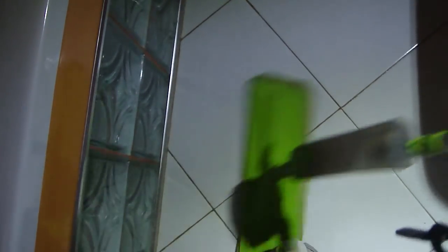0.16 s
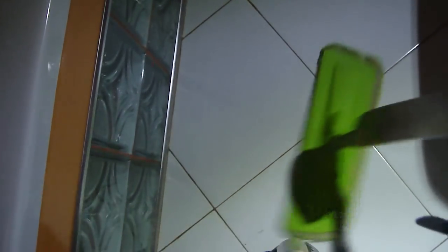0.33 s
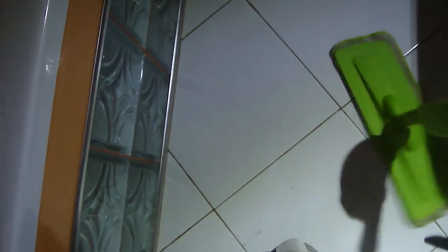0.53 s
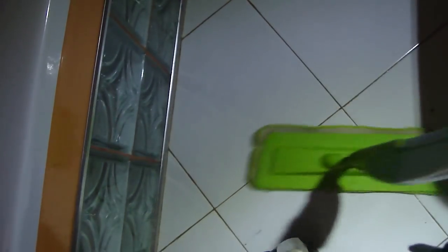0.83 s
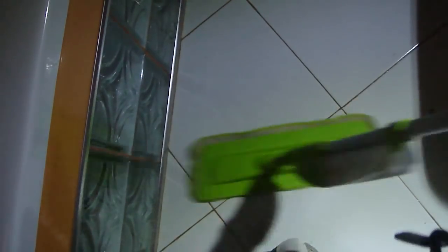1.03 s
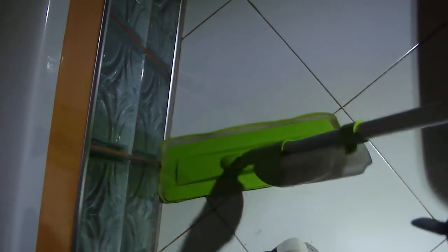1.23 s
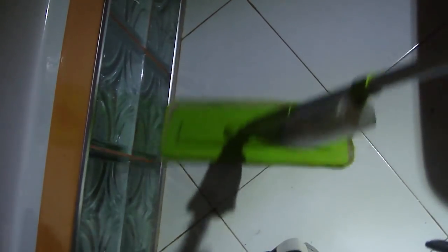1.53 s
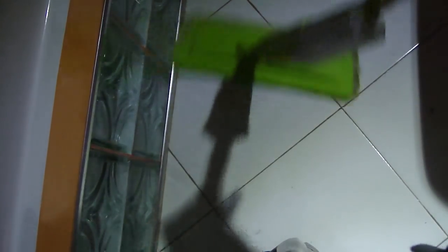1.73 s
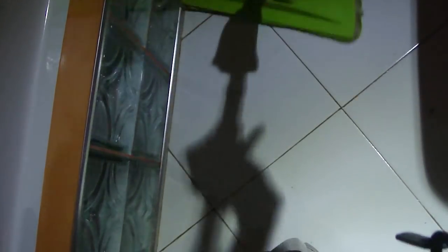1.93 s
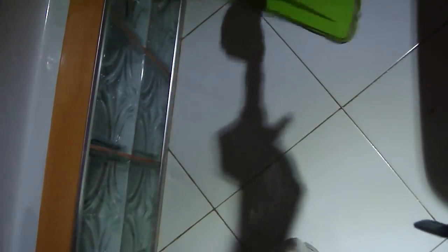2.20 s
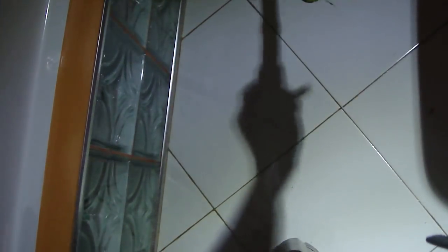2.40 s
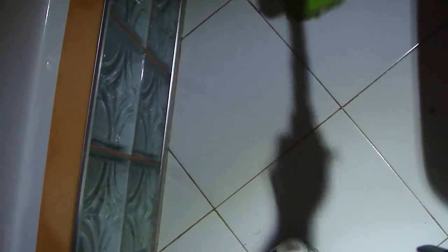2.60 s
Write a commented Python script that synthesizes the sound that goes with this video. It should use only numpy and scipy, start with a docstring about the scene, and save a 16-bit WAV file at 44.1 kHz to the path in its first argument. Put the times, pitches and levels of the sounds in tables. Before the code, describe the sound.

A flat plastic mop knocks, rattles and swishes over floor tiles in a small hard room

```python
"""Mop knocking and scuffing over tiles

A flat plastic mop is pushed over floor tiles in a small, hard room. Its head and joint knock, three times hard
against a wall, and chatter loosely: decaying modes with cracks and thuds. The cloth swishes, rumbles and scuffs:
coloured random grains. A steady broad noise fills the room. The hardest blows overload the recorder."""
import sys
import numpy as np
from scipy import signal
from scipy.fft import rfft, irfft, next_fast_len
from scipy.io import wavfile
from scipy.ndimage import map_coordinates

SR = 44100
rng = np.random.default_rng(int(sys.argv[2]) if len(sys.argv) > 2 else 0)


def voltage_ratio(level):
    """Linear amplitude factor for a level in decibels (scalar or array-like)."""
    return 10 ** (np.asarray(level, float) / 20)


def unload_wav(signal):
    """Save mono or channel-first audio to the path in sys.argv[1] as 16-bit WAV at rate SR, clipped to [-1, 1]."""
    wavfile.write(
        sys.argv[1],
        SR,
        np.round(np.clip(np.atleast_2d(signal).T, -1, 1) * 32767).astype(np.int16),
    )


N = 121275  # samples, 2.75 s

# modes of the mop head: pitch_hz, relative level_db, t60_s (capped in ring())
HEAD_MODES = [(525, -9, 0.036), (616, -45, 0.0056), (655, 7, 0.017), (750, 7.5, .016), (890, 12, 0.011),
              (1010, 10.5, 0.0033), (1250, 16.5, 0.007), (1459, 11.5, 0.0071), (1577, 7.5, 0.0063),
              (1688, 20, 0.0043), (1900, 1.5, 0.012), (2035, 0, 0.014), (2500, 11.5, 0.0072),
              (3200, -26, .006)]
# colour of the bright crack of plastic: freq_hz, relative level_db
CRACK_COLOUR = [(500, -31), (2000, 13), (4500, -5), (8000, -16), (11000, -37)]


def unit(x):
    """Scaled to rms 1."""
    return x / np.sqrt(np.mean(x ** 2) + 1e-20)


def along(points, hz):
    """Reads (Hz, value) points on a log frequency axis."""
    f, v = np.transpose(points)
    return np.interp(np.log(hz + 1), np.log(f + 1), v)


def filtered(x, response):
    """x times a response of frequency."""
    m = next_fast_len(len(x) + 8192)
    spectrum = rfft(x, m) * response(np.fft.rfftfreq(m, 1 / SR))
    return irfft(spectrum, m)[:len(x)]


def coloured(x, colour):
    """x with a (Hz, dB) colour, rms 1."""
    return unit(filtered(x, lambda hz: voltage_ratio(along(colour, hz))))


def wobble(rate):
    """A smooth random curve, rate knots a second."""
    knots = rng.standard_normal(int(N * rate / SR) + 4)
    return map_coordinates(knots, [np.arange(N) * rate / SR])


def near(centre_hz, reach_oct):
    """Weight of each mode in dB, falling away from a centre: 6 dB down at reach_oct."""
    return lambda hz: -6 * (np.log2(hz / centre_hz) / reach_oct) ** 2


def ring(modes, t, weight_db, longest_t60_s=0.018):
    """A struck body: damped sines, each a little stronger or weaker at every blow."""
    scatter_db, attack_s = 1.2, 0.0008
    hz, db, t60_s = np.transpose(modes)[:, :, None]
    start_db = db + weight_db(hz) + scatter_db * rng.standard_normal(hz.shape)
    decay_db = 60 * t / np.clip(t60_s, 1e-3, longest_t60_s)
    body = (voltage_ratio(start_db - decay_db) * np.sin(2 * np.pi * hz * t)).sum(0)
    return body * (1 - np.exp(-t / attack_s))


def knocks():
    """Every knock rings the head's modes near its centre, with a crack and a thud, and the room answers."""
    # knocks of head and joint: start_s, level_db (peak of the ring before the trim),
    # centre_hz of the ring, crack_db and thud_db (peaks over the ring's)
    blows = [(.006, -9, 740, -8.5, -6.5), (0.017, -10, 710, -18, -8.5), (.117, -5, 740, -12, -6),
             (.127, -10.5, 710, -38, -26), (0.1856, -1, 870, -14, -26), (.188, 7.5, 1480, -8.5, -7),
             (.192, 10.5, 820, -28, -4), (.5275, -12.5, 890, -30, -16), (.268, -15, 2900, -8, -33),
             (.540, -14, 700, -26, -9), (.553, -13.5, 750, -9, -20), (0.8394, -6, 1940, -18, -47),
             (.8415, -9, 1010, -35, -21.5), (0.852, -18, 1280, -21, -34), (1.142, -21, 2200, 4.5, -1.5),
             (1.16, -2, 1900, 4, -37), (1.164, -7, 2500, -1, -31), (1.168, 6, 780, -26, -8),
             (1.171, 4, 1900, -5.5, -14.5), (1.18, -1, 1230, -3, -4.5), (1.712, -11, 1900, -11, -32),
             (1.7562, -11, 980, -9, -24), (1.783, -10, 1200, -31, -26), (1.896, -15, 915, -4, -34),
             (1.9835, -14.5, 790, -34, -18), (1.996, -37, 890, -37, -18.5), (2.212, -17, 726, -2, -31),
             (2.244, -16.5, 650, -28, -27), (2.266, -16, 1010, -17, -24), (2.275, -6, 655, -24, -20),
             (2.284, -11, 760, -28, -27), (2.411, -4, 2030, -25, -33), (2.416, -2, 614, -0.5, -9),
             (2.422, 1, 1060, -10.5, -12), (2.632, -12, 1500, -12, -33), (2.7155, -16.5, 1090, -23, -23)]
    # low modes of the thud: pitch_hz, relative level_db, t60_s
    thud_modes = [(170, -16, 0.024), (266, -14, 0.013), (290, -20, 0.063), (366, -7.5, 0.027)]
    reach_oct, trim_db, crack_t60_s = 0.55, -2, 0.025
    out, t = np.zeros(N + SR), np.arange(SR // 10) / SR
    for start_s, level_db, centre_hz, crack_db, thud_db in blows:
        body = ring(HEAD_MODES, t, near(centre_hz, reach_oct))
        thud = ring(thud_modes, t, lambda hz: 0, longest_t60_s=1)
        burst = rng.standard_normal(len(t)) * voltage_ratio(-60 * t / crack_t60_s)
        crack = filtered(burst, lambda hz: voltage_ratio(along(CRACK_COLOUR, hz)))
        blow = body / abs(body).max()
        blow = blow + voltage_ratio(crack_db) * crack / abs(crack).max()
        blow = blow + voltage_ratio(thud_db) * thud / abs(thud).max()
        hit = room(voltage_ratio(level_db + trim_db) * blow)
        out[round(start_s * SR):][:len(hit)] += hit
    return out[:N]


def rattles():
    """The loose head chatters after a knock: quick uneven taps ring the same modes, weaken, then stop."""
    # bouts of chatter: start_s, length_s, level_db (at the start), loss_db (over the length),
    # centre_hz of the ring, edge_db (bright edge over the ring)
    bouts = [(0.015, 0.046, -28, 10, 770, -17), (0.122, 0.033, -25.5, 6, 796, -8.5),
             (.2, 0.11, -9.5, 13, 1087, -11.5), (.53, 0.046, -23.5, 6.5, 710, -11),
             (0.844, 0.039, -23, 8, 1250, -8), (1.179, 0.13, -20, 13, 1220, -7),
             (1.755, 0.045, -21, 5, 1010, -19.5), (1.984, 0.047, -30.5, 6.5, 780, -19),
             (2.287, 0.11, -33, 16, 715, -20), (2.41, 0.055, -12, 9, 860, -22.5),
             (2.634, 0.055, -23, 17, 740, -14), (2.72, 0.049, -28, 5, 834, -17)]
    taps_per_s, tap_spread_db, reach_oct = 1100, 2.5, 0.9
    rise_s, settle_s = 0.00073, 0.006
    out, t = np.zeros(N + SR), np.arange(SR // 5) / SR
    for start_s, length_s, level_db, loss_db, centre_hz, edge_db in bouts:
        taps = (rng.random(len(t)) < taps_per_s / SR) * rng.standard_normal(len(t))
        taps = taps * voltage_ratio(tap_spread_db * rng.standard_normal(len(t)))
        body = ring(HEAD_MODES, t[:SR // 20], near(centre_hz, reach_oct))
        chatter = unit(signal.fftconvolve(taps, body)[:len(t)])
        chatter = chatter + voltage_ratio(edge_db) * coloured(taps, CRACK_COLOUR)
        fade = voltage_ratio(level_db - loss_db * t / length_s)
        stop = np.exp(-np.clip(t - length_s, 0, 1) / settle_s)
        hit = room(chatter * fade * stop * np.clip(t / rise_s, 0, 1))
        out[round(start_s * SR):][:len(hit)] += hit
    return out[:N]


def grit():
    """Dense tiny slips of fibres, uneven in size."""
    grains_per_s, spread_db = 6000, 2
    slips = (rng.random(N) < grains_per_s / SR) * rng.standard_normal(N)
    return slips * voltage_ratio(spread_db * rng.standard_normal(N))


def cloth():
    """Fibres slip over the tiles: a swish, a low rumble through the head, and short scuffs."""
    # the cloth slides: time_s, swish_db, rumble_db (levels before flutter)
    stroke = [(0, -45, -32.5), (.15, -41, -39), (.4, -43, -33), (.5, -41.5, -47.5), (.6, -42, -47.5),
              (.7, -52, -45.5), (.95, -44, -44.5), (1.13, -43, -49), (1.4, -49.5, -50), (1.55, -39.5, -54),
              (1.68, -37, -37), (1.85, -33.5, -44.5), (1.95, -41, -38), (2.02, -69, -72),
              (2.13, -57, -45.5), (2.22, -48, -37), (2.35, -42.5, -39), (2.6, -46.5, -51.5),
              (2.75, -46.5, -40)]
    # short scuffs of the cloth edge: start_s, length_s, level_db (before flutter)
    edge_scuffs = [(0.203, 0.011, -27), (1.152, 0.047, -19.5), (1.699, 0.02, -24), (1.754, 0.033, -26.5),
                   (1.884, 0.012, -21.5), (2.172, 0.038, -35), (2.4, 0.025, -20)]
    # colours of the three sounds: freq_hz, relative level_db (per Hz)
    swish_colour = [(470, -16), (800, -11), (992, -12), (1090, -2.5), (1190, -26), (2510, -15.5),
                    (7850, -28), (10500, -31.5), (13600, -38), (22000, -120)]
    rumble_colour = [(88, -57), (150, 6), (314, -1), (539, -1), (815, -1.5), (1560, -3), (3000, -40),
                     (3900, -37), (6600, -120)]
    scuff_colour = [(180, -39), (300, -26), (902, 10.5), (1560, -16.5), (1680, -4.5), (3760, -3.5),
                    (8920, -9.5), (10500, -17), (13600, -36), (22000, -120)]
    flutter_db, rumble_flutter_db = 1.5, 1.03
    rise_s, fall_s = 0.015, 0.0028
    t = np.arange(N) / SR
    time_s, swish_db, rumble_db = np.transpose(stroke)
    swish_level = voltage_ratio(np.interp(t, time_s, swish_db) + flutter_db * wobble(24.64))
    swish = swish_level * coloured(grit(), swish_colour)
    rumble_level = voltage_ratio(np.interp(t, time_s, rumble_db) + rumble_flutter_db * wobble(45.77))
    rumble = rumble_level * coloured(grit(), rumble_colour)
    shape = np.zeros(N)
    for start_s, length_s, level_db in edge_scuffs:
        rise = np.clip((t - start_s) / rise_s, 0, 1)
        fall = np.exp(-np.clip(t - start_s - length_s, 0, 1) / fall_s)
        shape += voltage_ratio(level_db) * rise * fall
    scuff = shape * voltage_ratio(flutter_db * wobble(150)) * coloured(grit(), scuff_colour)
    return room(swish + rumble + scuff)[:N]


def floor():
    """Steady broad noise: coloured random noise whose level barely moves."""
    # colour of the noise: freq_hz, relative level_db (per Hz)
    noise_colour = [(15, -69), (25, -24.5), (74, -22), (162, -11), (446, -4), (703, -1), (1360, -8),
                    (2620, -5.5), (6020, -19), (7560, -18), (9490, -21.5), (10500, -34), (13600, -90),
                    (22000, -120)]
    level_db, drift_db = -37.5, 0.4
    return voltage_ratio(level_db + drift_db * wobble(8.2)) * coloured(rng.standard_normal(N), noise_colour)


def room(x):
    """The sound itself, a few near walls and a fresh tail that dies band by band."""
    # decay of the tail: freq_hz, t60_s
    tail_decay = [(100, 0.65), (260, 0.32), (700, 0.34), (1800, 0.3), (4800, 0.34), (10000, 0.19)]
    # echoes of near walls: delay_s, level_db
    near_walls = [(.004, -13.5), (.009, -10), (.014, -18), (.021, -15.5)]
    wet_db, build_s = -2, 0.004
    hz, t, z = signal.stft(rng.standard_normal(SR // 2), SR, nperseg=256)
    decay = voltage_ratio(-60 * t / along(tail_decay, hz)[:, None])
    tail = signal.istft(z * decay, SR, nperseg=256)[1]
    tail = tail * (1 - np.exp(-np.arange(len(tail)) / SR / build_s))
    tail = voltage_ratio(wet_db) * tail / np.linalg.norm(tail)
    tail[0] = 1  # the direct sound
    for delay_s, level_db in near_walls:
        tail[round(delay_s * SR)] += voltage_ratio(level_db)
    return signal.fftconvolve(x, tail)


def scene():
    """All sources, one channel; the mop is too small to sound deep, the steady noise is not."""
    radiates_hz = 160  # corner of each of four high-pass stages
    mop = knocks() + rattles() + cloth()
    mop = filtered(mop, lambda hz: (1j * hz / (radiates_hz + 1j * hz)) ** 4)
    return (mop + floor())[None]


def top_cut(x):
    """Nothing passes above the cut-off."""
    return signal.sosfilt(signal.butter(12, 16350, fs=SR, output="sos"), x)


def record(dry):
    """A small microphone with a steep top, a hard overload at full scale, then a band limit."""
    mic_top_hz, band_top_hz = 10430, 16300
    mic = filtered(dry[0], lambda hz: 1 / (1 + (hz / mic_top_hz) ** 40) * (hz < 11000))
    overloaded = np.clip(mic, -1, 1)
    mix = filtered(overloaded, lambda hz: hz < band_top_hz)[None]
    return top_cut(mix)


dry = scene()
out = record(dry)
unload_wav(out)
```